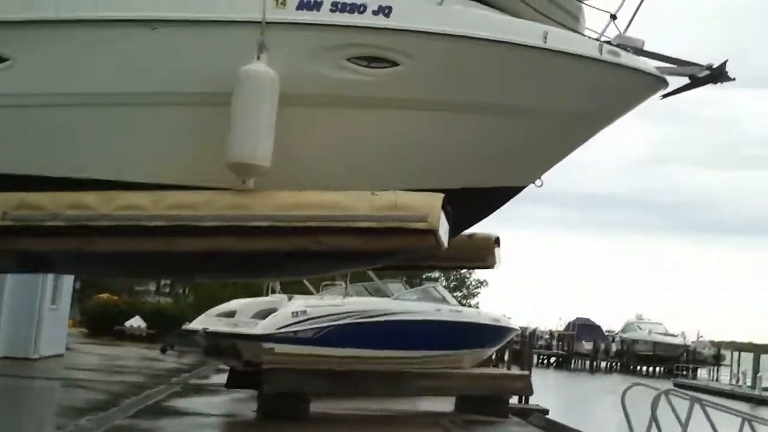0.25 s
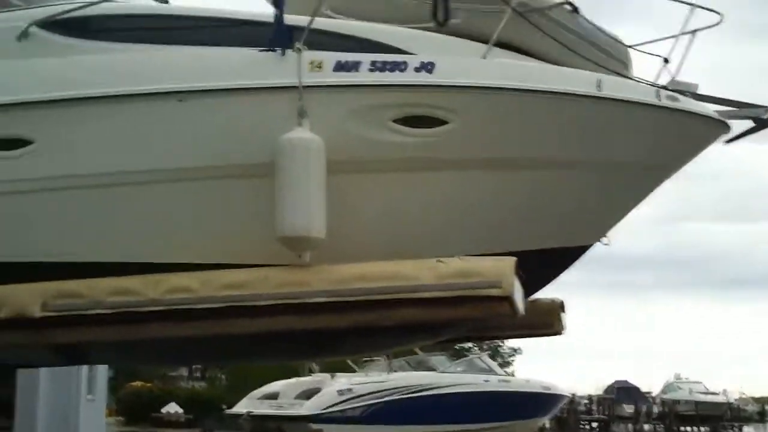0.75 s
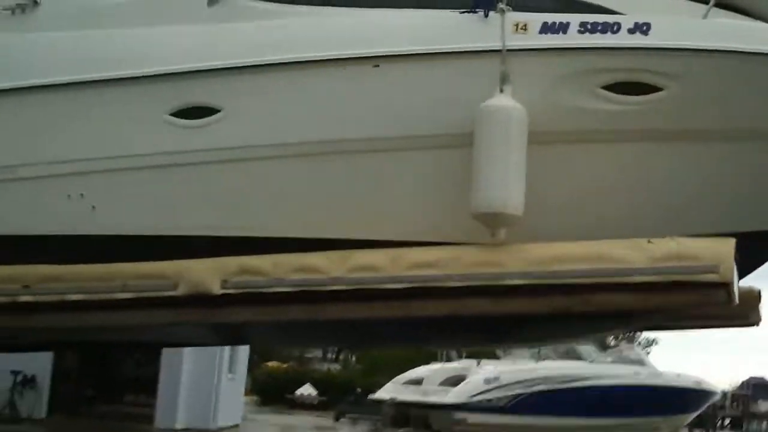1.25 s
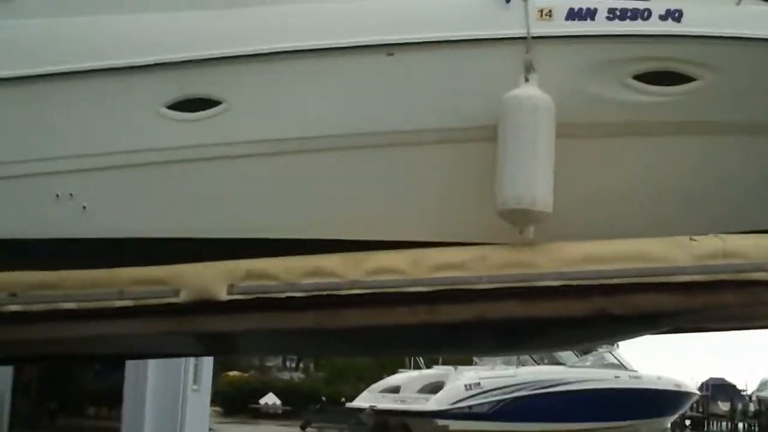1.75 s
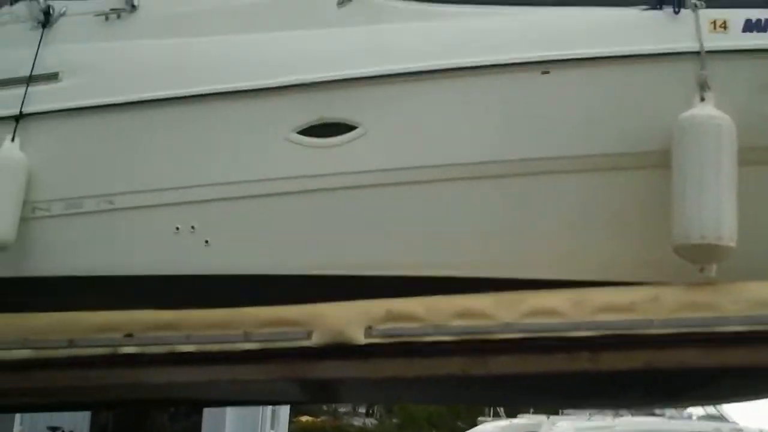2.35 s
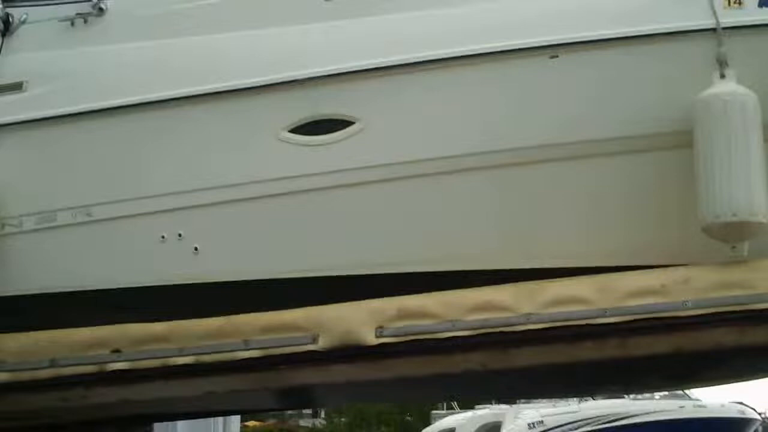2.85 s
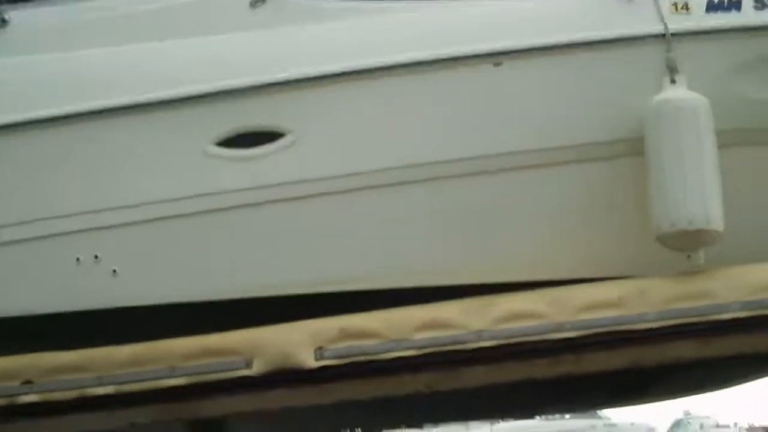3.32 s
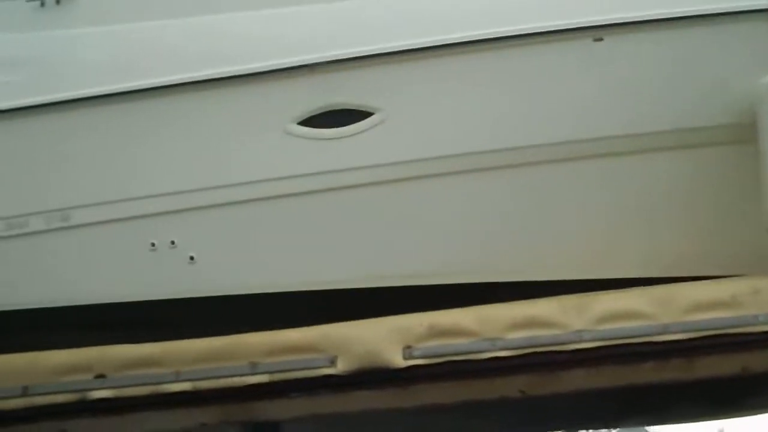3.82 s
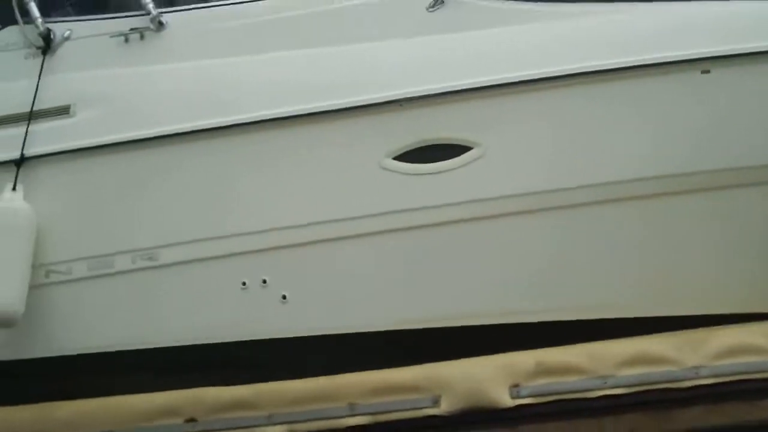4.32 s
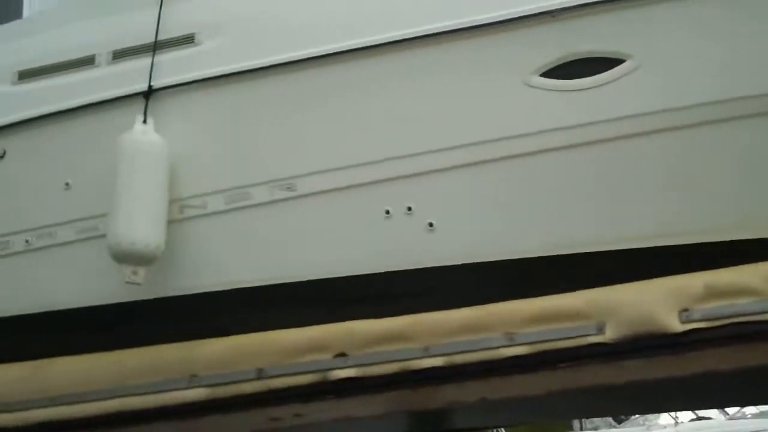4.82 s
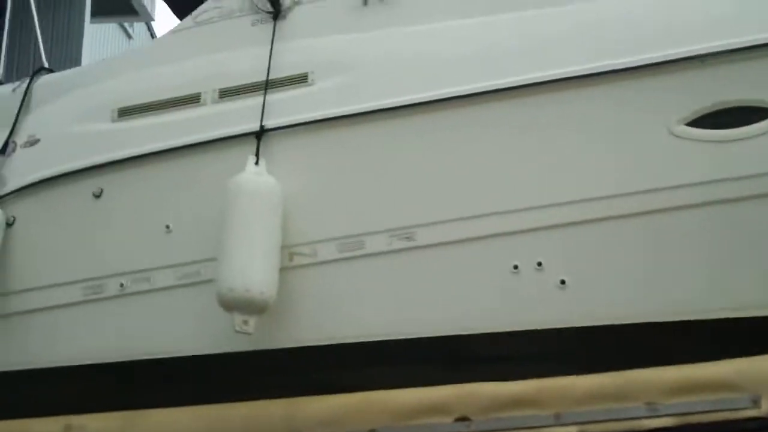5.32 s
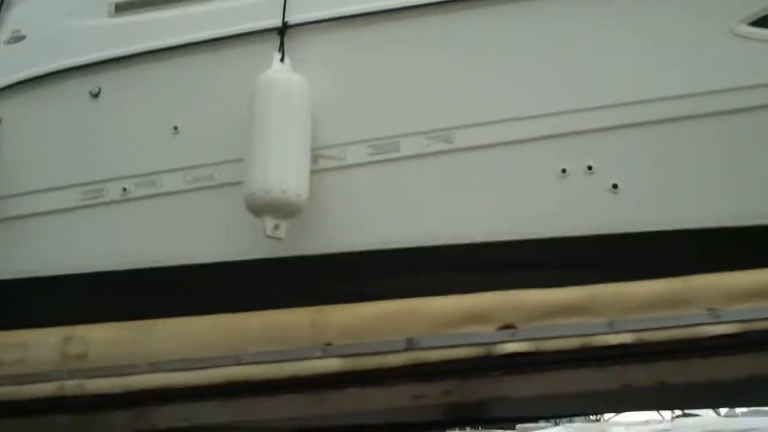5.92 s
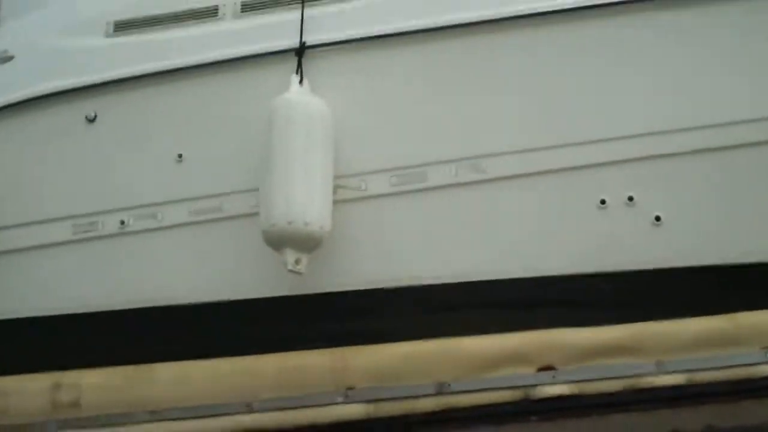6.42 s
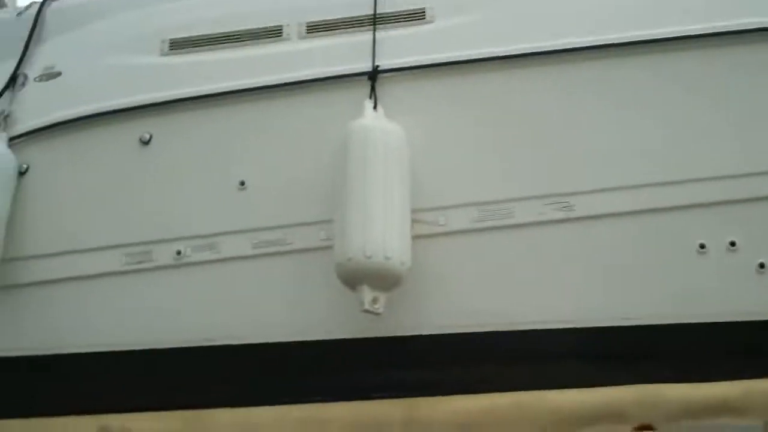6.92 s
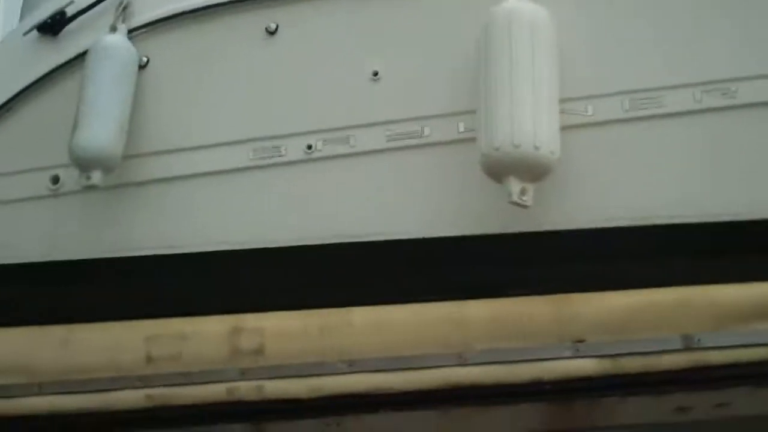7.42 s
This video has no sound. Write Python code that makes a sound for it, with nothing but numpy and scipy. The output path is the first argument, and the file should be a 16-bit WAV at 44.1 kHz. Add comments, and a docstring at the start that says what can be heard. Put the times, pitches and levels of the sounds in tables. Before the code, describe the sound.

A heavy six-cylinder engine drones low and steady, gradually louder and then level, never revving. Around the boom are noisy engine air, repeating valve clatter and wavering thin whines that swell and fade. Sharp little ticks, like grit or drops, come irregularly and grow more frequent later; a brief chirp and a duller knock pass quickly. Open wet yard, heard in mono from nearby.

```python
"""Wet yard: a large forklift with a six-cylinder diesel creeps closer at idle speed, carrying a boat.
Sines locked to the crank make the exhaust boom at the firing rate, fan, hydraulic pump and gear tones.
Coloured noise, with a clatter repeating every two crank turns, makes the broad roar and its narrow bands.
Short filtered bursts make ticks of grit or drops close by, one knock and a denser faint crackle.
A short squeak and thin turbocharger whistles lie on top. One microphone feeds both channels."""
import sys
import numpy as np
from scipy import signal
from scipy.fft import rfft, irfft
from scipy.io import wavfile

SR = 44100
rng = np.random.default_rng(int(sys.argv[2]) if len(sys.argv) > 2 else 0)


def unload_audio(sound):
    """Save the sound as a 16-bit wav file, at the path given as the first command line argument."""
    columns = np.transpose(np.atleast_2d(sound))
    # keep every value between -1 and 1, then stretch to whole-number steps
    steps = np.round(np.clip(columns, -1, 1) * 32767)
    wavfile.write(sys.argv[1], SR, steps.astype(np.int16))


N = 337806

# roar over time: time_s, level_db (rms above 600 Hz), treble_gain_db, low_gain_db
ROAR_CURVE = [(0.0, -32, -3.5, -0.5), (0.92, -32.5, 0, -4), (1.45, -31.5, -2.5, -12),
              (2.25, -30.5, -0.5, -27), (2.95, -31, 2.5, 3), (3.82, -31, 2.5, -4), (4.8, -30, 2, 2),
              (5.6, -29.5, 2, -5), (6.3, -29.5, 2.5, 7), (6.87, -29.5, 1, -10), (7.66, -28.5, 2, 10)]


def amp(db):
    """dB to gain."""
    return 10 ** (np.asarray(db) / 20)


def rms_one(x):
    """Scale to unit rms."""
    return x / np.sqrt(np.mean(x ** 2) + 1e-20)


def in_time(rows):
    """Columns of a curve table at every sample."""
    time_s, *columns = np.transpose(rows)
    return [np.interp(np.arange(N) / SR, time_s, column) for column in columns]


def coloured(x, points):
    """Filter by a (Hz, dB) spectrum, interpolated over log frequency."""
    hz, db = np.transpose(points)
    grid_hz = np.maximum(np.arange(N // 2 + 1) * SR / N, 1)
    gain_db = np.interp(np.log(grid_hz), np.log(hz), db)
    return irfft(rfft(x) * amp(gain_db), N)


def drift(corner_hz):
    """Random wander of spread 1: noise through two equal one-pole low-passes."""
    step = 40  # samples per coarse point
    r = np.exp(-2 * np.pi * corner_hz * step / SR)
    noise = rng.standard_normal(N // step + 4002)
    slow = signal.lfilter([1], [1, -2 * r, r * r], noise)[4000:]  # settled part
    return np.interp(np.arange(N) / step, np.arange(len(slow)), rms_one(slow - slow.mean()))


def high_pass(x, corner_hz):
    """Fourth-order Butterworth high-pass."""
    return signal.sosfilt(signal.butter(4, corner_hz, "high", fs=SR, output="sos"), x)


def narrow_band(x, hz, width_hz):
    """Two-pole band-pass, gain 1 on top."""
    r = np.exp(-np.pi * width_hz / SR)
    poles = [1, -2 * r * np.cos(2 * np.pi * hz / SR), r * r]
    return signal.lfilter([(1 - r * r) / 2, 0, (r * r - 1) / 2], poles, x)


def bump(peak_s, half_width_s):
    """Gaussian rise and fall, 1/e at the half width."""
    return np.exp(-((np.arange(N) / SR - peak_s) / half_width_s) ** 2)


def tone(turns, rms_db):
    """A sine locked to a rotation, at an rms level, with a random start phase."""
    return np.sqrt(2) * amp(rms_db) * np.sin(2 * np.pi * (turns + rng.random()))


def harmonics(turns, table, waver_db):
    """Tones at multiples of a rotation; echoes off hull and ground make each swell and fade on its own."""
    return sum(tone(order * turns, db + waver_db * drift(0.46)) for order, db in table)


def crank_turns():
    """Crankshaft position in turns; the governor lets the speed hunt a little."""
    # time_s, crank_rpm
    speed_rows = [(0.0, 753.3), (1.53, 753.4), (3.06, 751.5), (4.59, 751.0), (6.12, 751.2), (7.65, 750.8)]
    turns = np.cumsum(in_time(speed_rows)[0]) / 60 / SR
    return turns + .0015 * drift(3.0)


def hum(crank, near_db):
    """Rotation-locked tones: exhaust, gears, engine orders, fan blades and hydraulic pump."""
    # exhaust boom, growing as the truck comes closer: time_s, level_db rms
    boom_rows = [(0.1, -22), (1.74, -22.5), (3.34, -18), (6.37, -12.5), (7.47, -12.5), (7.55, -12.5)]
    # other engine tones: crank_multiple, level_db rms at mean boom
    order_rows = [(2, -50), (2.5, -47), (3.5, -48), (4, -41.5), (4.5, -43), (5, -53), (7.5, -53), (9, -55),
                  (12, -43), (15, -46), (19.5, -50), (22.5, -51), (25.5, -50), (28.5, -47), (30, -51),
                  (31.5, -51), (33, -51), (34.5, -49), (37.5, -49), (40.5, -55), (43, -52), (52.5, -51)]
    # fan tones: fan_multiple, level_db rms at mean roar
    fan_rows = [(8, -50), (10, -48), (12, -52), (16, -51), (20, -51), (22, -51), (28, -52)]
    # pump tones: stroke_rate_multiple, level_db rms at mean roar
    pump_rows = [(2, -45), (3, -49), (4, -52)]
    fan_ratio, pump_ratio = 1.1597, 10.555  # turns, strokes per crank turn
    gear_teeth = 42  # meshes per crank turn

    firing_db, = in_time(boom_rows)
    grown_db = firing_db - firing_db.mean()
    angle = 2 * np.pi * (3 * crank + rng.random())  # six cylinders fire three times a turn
    # dB rms at mean boom + share of its growth + waver
    second_db = -35.5 + 0.43 * grown_db + 0.84 * drift(1.0)
    whine_db = -41.5 + 0.3 * grown_db + 3.0 * drift(16.0)
    blades_db = -31.5 + 0.61 * grown_db + .9 * drift(1.5)

    # each puff pulls the pressure down more sharply than it lets it rise
    first = amp(firing_db + .3 * drift(6.0)) * np.cos(angle)
    exhaust = np.sqrt(2) * (first - amp(second_db) * np.cos(2 * angle))
    gear_whine = tone(gear_teeth * crank, whine_db)
    orders = amp(0.42 * grown_db) * harmonics(crank, order_rows, 1.4)
    fan = fan_ratio * crank
    blades = tone(6 * fan, blades_db)
    rest = harmonics(fan, fan_rows, 0.78) + harmonics(pump_ratio * crank, pump_rows, 0.58)
    steady = exhaust + gear_whine + orders + blades + amp(near_db) * rest
    return steady + swells(crank) + pump_beat(crank, pump_ratio)


def swells(crank):
    """Some engine tones rise out of the roar and sink back as the path to the ear changes."""
    # crank_multiple (sounded at the nearest half), peak_s, half_width_s, level_db rms at peak
    swell_rows = [(1.5, 6.7, 1.8, -52), (9.5, 6.2, 0.77, -46), (9.5, 0.54, 1.1, -45), (10, 5.6, 1.2, -55),
                  (16.5, 1.1, 1.6, -45.5), (16.5, 5.3, 1.9, -44), (16.5, 6.23, .4, -37.5),
                  (18, 0.33, 2.4, -47), (18, 4.8, 1.6, -40), (18, 7.05, 1.5, -43.5), (21, 3.4, 0.9, -48),
                  (21, 3.4, 0.31, -36.5), (21, 4.76, 0.43, -41), (21, 7.07, 1, -39.5),
                  (24, 1.4, 1.15, -39.5), (24, 3.66, 1, -35), (24, 4.8, 0.43, -35), (24, 6.35, 2.1, -41),
                  (27, 0.12, 0.34, -40), (27, 1.46, 0.35, -39), (27, 4.2, 0.74, -42), (27, 2.44, 1.03, -39),
                  (27, 5.27, 0.41, -36.5), (27, 6.22, 0.54, -36.5), (46.5, 0.84, 1.2, -45.5),
                  (46.5, 3.2, 0.6, -43), (46.5, 5.03, 0.59, -41), (46.5, 6.24, 0.39, -42),
                  (49.5, 1.7, 1.3, -44.5), (49.5, 5.8, 0.99, -48), (55.96, 1.7, 1.9, -50),
                  (55.67, 7.2, 1.3, -45.5), (56.8, 2.8, 2.3, -51.5), (56.5, 6.6, 1.2, -54.5),
                  (57.3, 7.4, 1.4, -44)]
    power = {}  # by half crank multiples; swells of one tone add in power
    for order, peak_s, half_width_s, db in swell_rows:
        half_order = round(2 * order)
        power[half_order] = power.get(half_order, 0) + (amp(db) * bump(peak_s, half_width_s)) ** 2
    flutter_db = 2.2
    return sum(np.sqrt(p) * tone(half_order / 2 * crank, flutter_db * drift(9.7))
               for half_order, p in sorted(power.items()))


def pump_beat(crank, pump_ratio):
    """The pump stroke beats slowly against the engine tone beside it."""
    # pair level: time_s, gain_db
    beat_rows = [(0, 6.5), (.8, -4), (1.5, 2), (2.7, -3), (4.2, -2.5), (5.8, 3.5), (7.66, 2)]
    in_step_s, beside_order = 4.2, 10.5
    since = crank - crank[int(in_step_s * SR)]
    start = rng.random()
    stroke = amp(-39 + .8 * drift(1.2)) * np.sin(2 * np.pi * (pump_ratio * since + start))
    beside = amp(-44.5) * np.sin(2 * np.pi * (beside_order * since + start))
    return np.sqrt(2) * amp(in_time(beat_rows)[0]) * (stroke + beside)


def roar(crank):
    """Block, intake and fan air: noise plus repeating clatter, broadly coloured, with narrow bands on top."""
    # relative noise spectrum, lower and upper part: pitch_hz, level_db
    low_rows = [(15, 8), (24, -4), (30, -10), (41, -7), (59, -3), (105, -8.5), (125, -6), (180, -7.5),
                (310, -9.5), (480, -10), (760, -11.5), (1080, -13.5), (1150, -16)]
    high_rows = [(1500, -14.5), (2300, -13.5), (2700, -17.5), (3050, -20), (4200, -21.5), (4750, -26),
                 (6400, -25), (7600, -27), (8500, -29), (11800, -32.5), (13500, -38.5), (14800, -50),
                 (15500, -64)]
    # repeating clatter: pitch_hz, level_db relative to the source noise
    clatter_rows = [(250, -13), (450, -2.5), (1000, -2), (2200, -11.5), (3500, -9)]
    # narrow wavering bands of noise in the roar: pitch_hz, width_hz, gain_db
    band_rows = [(642, 35, -18), (824, 11, -16.5), (892, 4.8, -12), (967, 95, -17.5), (1018, 27, -22),
                 (1040, 6.1, -15), (1077, 36, -21.5), (1334, 34, -15.5), (1450, 5.4, -17),
                 (1570, 10, -11.5), (1666, 16, -19.5), (1752, 15, -13.5), (1856, 26, -17),
                 (1910, 17, -15.5), (2020, 12, -14.5), (2387, 40, -19.5), (2620, 15, -16.5),
                 (3770, 300, -28), (4090, 92, -25.5), (5290, 660, -34), (7000, 440, -33.5)]
    # narrow bands that stand out for a while: pitch_hz, width_hz, peak_s, half_width_s, gain_db
    passing_rows = [(1300, 17, 6.6, 1.2, -20), (1335, 11, 6, 0.45, -7), (1450, 9.1, 8, 0.99, -18),
                    (1642, 16, 5.2, 1.0, -19), (1700, 13, 6.1, .6, -19), (1790, 14, 7.3, 1.0, -12),
                    (1920, 13, 7.6, 0.71, -24), (1960, 39, 7.4, 0.45, -23), (2405, 14, 1.1, 1.6, -16),
                    (2440, 11, 5.7, 1.3, -16)]

    level_db, bright_db, rumble_db = in_time(ROAR_CURVE)
    source = rng.standard_normal(N) + coloured(valve_gear(crank), clatter_rows)
    body = coloured(source, low_rows + high_rows)
    for hz, width_hz, db in band_rows:
        waver_db = 3 * min(1, 24 / width_hz)  # bands broader than 24 Hz waver less
        body += amp(db + waver_db * drift(0.19)) * narrow_band(source, hz, width_hz)
    for hz, width_hz, peak_s, half_width_s, db in passing_rows:
        body += amp(db) * bump(peak_s, half_width_s) * narrow_band(source, hz, width_hz)

    # mid clatter pulses with each firing, unevenly by cylinder
    firing_pulse = np.cos(6 * np.pi * crank)
    uneven = np.cos(np.pi * crank) + np.cos(4 * np.pi * crank)
    pulse_db = .6 * firing_pulse + .3 * uneven
    body += (amp(pulse_db) - 1) * coloured(body, [(350, -30), (600, 0), (2500, 0), (5000, -8)])
    # injectors pulse the treble, the air flutters
    throb_db = 0.25 * firing_pulse + 1.0 * drift(4.9)
    body += (amp(bright_db + throb_db) - 1) * coloured(body, [(2500, -28), (9000, -3.5)])
    body += (amp(rumble_db) - 1) * coloured(body, [(250, -6.0), (500, -35)])
    return amp(level_db) * body / np.std(high_pass(body, 600))


def valve_gear(crank):
    """Clatter that repeats every two turns; the pattern slowly changes as the listening angle does."""
    patterns = rng.standard_normal((4, 7040))  # points per two turns
    at = (crank / 2 % 1 * patterns.shape[1]).astype(int)
    shares = np.array([drift(0.38) for _ in patterns])
    return np.sum(shares * patterns[:, at], axis=0) / np.sqrt(np.sum(shares ** 2, axis=0))


def whistles(near_db):
    """Thin turbocharger whistles whose pitch wanders together and trembles apart."""
    # pitch_hz, level_db rms at mean roar
    whistle_rows = [(6790, -60.5), (7045, -58.5)]
    wander_hz, tremble_hz = 21.96 * drift(.7), 24.74
    total = 0
    for hz, db in whistle_rows:
        turns = np.cumsum(hz + wander_hz + tremble_hz * drift(30.9)) / SR
        total = total + tone(turns, db + near_db + 3.8 * drift(1.2))
    return total


def burst(t, t60_s, tail_db, tail_s):
    """Envelope: a snap dying in milliseconds over a fainter Gaussian tail."""
    return amp(-60 * t / t60_s) + amp(tail_db) * np.exp(-(t / tail_s) ** 2)


def ticks():
    """Each tick is a high-passed snap of random signs with a fainter spray of hiss."""
    # time_s (snap 1 ms later), drive_db before filtering, high_pass_hz, spray_db under the snap
    tick_rows = [(0.2093, -31, 8000, -20), (0.2368, -31, 8000, -21), (0.5784, -34, 7500, -12),
                 (0.596, -33, 8000, -18), (0.612, -34, 8000, -24), (0.799, -30, 10500, -24),
                 (0.8429, -21, 9000, -30), (0.9257, -31, 8000, -26), (1.281, -31, 11000, -28),
                 (1.5383, -28, 10500, -16), (1.889, -32, 12000, -17), (2.165, -29, 7500, -22),
                 (2.3021, -28, 9500, -20), (2.7735, -27, 7000, -22), (3.9603, -23, 9700, -15),
                 (4.0546, -26, 9500, -26), (4.2222, -26, 9000, -22), (4.2475, -29, 10000, -26),
                 (4.556, -28, 8000, -24), (4.8288, -24, 11500, -18), (5.2739, -19.5, 8500, -24),
                 (5.8565, -28, 12000, -18), (5.866, -23, 8000, -28), (5.9937, -28, 8000, -26),
                 (6.1628, -25, 11000, -26), (6.187, -27, 11500, -24), (6.3688, -26, 8000, -24),
                 (6.8941, -25, 10500, -22), (6.946, -28, 11500, -26), (7.0448, -24, 9800, -22),
                 (7.1201, -26, 9000, -25), (7.3292, -18, 6500, -30), (7.369, -29, 10500, -26)]
    # tick spectrum: pitch_hz, gain_db
    tick_band = [(4500, -8), (7500, 1.5), (11000, 2.5), (13500, -4), (15500, -17)]
    t = np.arange(2048) / SR
    bright = np.zeros(N)
    for time_s, db, low_hz, spray_db in tick_rows:
        snap = burst(t, .005, spray_db, .022) * rng.choice([-1, 1], len(t))
        at = round((time_s + .001) * SR) + np.arange(len(t))
        bright[at] += amp(db) * high_pass(snap, low_hz)
    return coloured(bright, tick_band)


def knock():
    """A duller snap of random signs with a faint rattle after it."""
    # knock spectrum: pitch_hz, gain_db
    knock_band = [(500, -12), (1300, 6), (3500, 3), (8000, -3), (9500, -18), (13000, -17), (15500, -26)]
    t = np.arange(2048) / SR
    dull = np.zeros(N)
    at = round(5.8307 * SR) + np.arange(len(t))
    dull[at] = amp(-14) * burst(t, .005, -21, .025) * rng.choice([-1, 1], len(t))
    return coloured(dull, knock_band)


def chirp():
    """A few milliseconds of two high tones, as from rubber or metal slipping."""
    # length_s, pitch_hz, level_db
    length_s, hz, db = (0.012, 8500, -27.5)
    t = np.arange(N) / SR - 2.961
    window = np.sin(np.pi * np.clip(t / length_s, 0, 1))
    tones = np.sin(2 * np.pi * hz * t) + amp(-7) * np.sin(2 * np.pi * 5700 * t)
    return amp(db) * window * tones * amp(3.0 * drift(300))


def crackle(median_per_s, drive_db):
    """Fainter ticks: single-sample impulses at random, in clumps, through a treble band."""
    born = rng.random(N) < median_per_s * amp(8.0 * drift(8.0)) / SR
    sizes = amp(4.4 * np.minimum(rng.exponential(1, N), 3)) * rng.choice([-1, 1], N)
    return amp(drive_db) * coloured(born * sizes, [(4000, -25), (8000, -1), (12000, 2), (15500, -11)])


def scene():
    """All sources reach one microphone."""
    crank = crank_turns()
    level_db = in_time(ROAR_CURVE)[0]
    near_db = level_db - level_db.mean()
    machine = hum(crank, near_db) + roar(crank) + whistles(near_db)
    mono = machine + ticks() + knock() + chirp() + crackle(60.0, -39.5)
    return np.array([mono, mono])


def record(dry):
    """Steep elliptic low-pass cuts the top above 15480 Hz."""
    return signal.sosfilt(signal.ellip(16, .5, 70, 15480, fs=SR, output="sos"), dry)


dry = scene()
out = record(dry)
unload_audio(out)
```